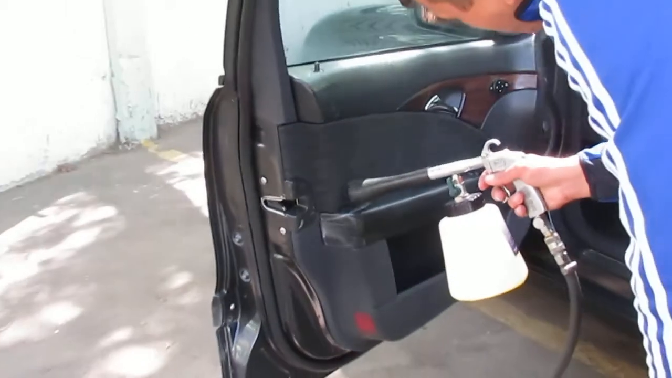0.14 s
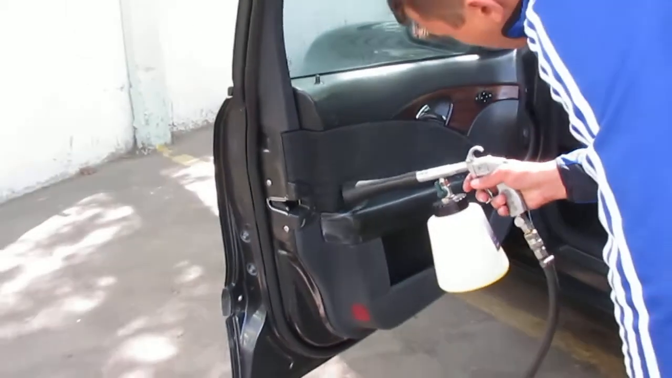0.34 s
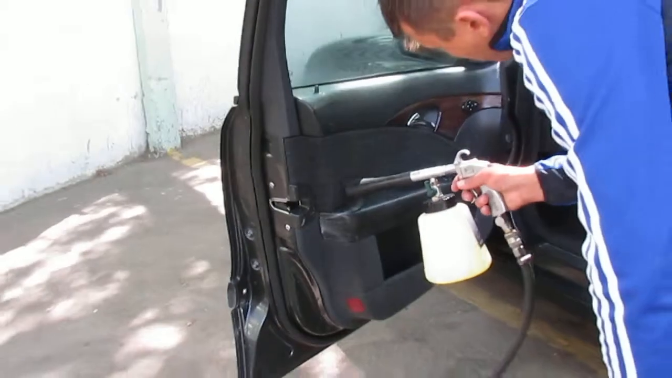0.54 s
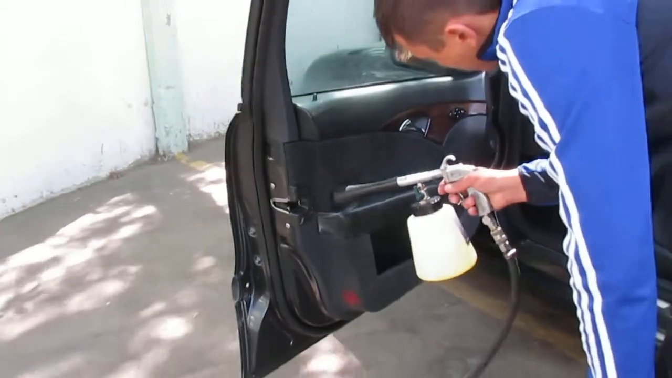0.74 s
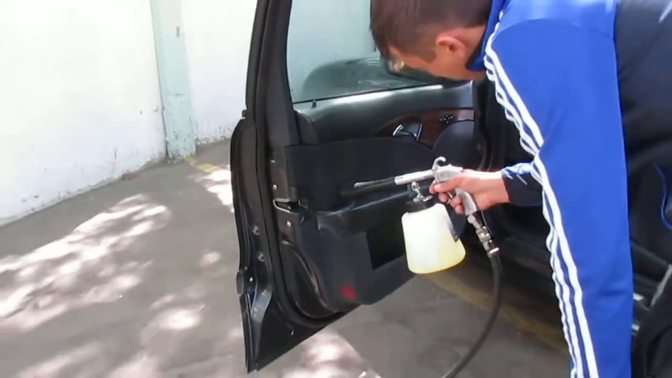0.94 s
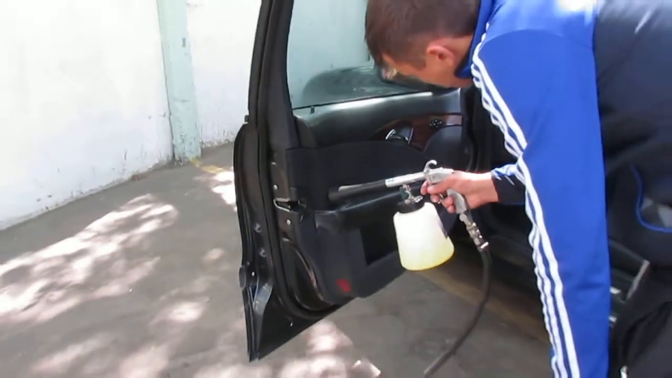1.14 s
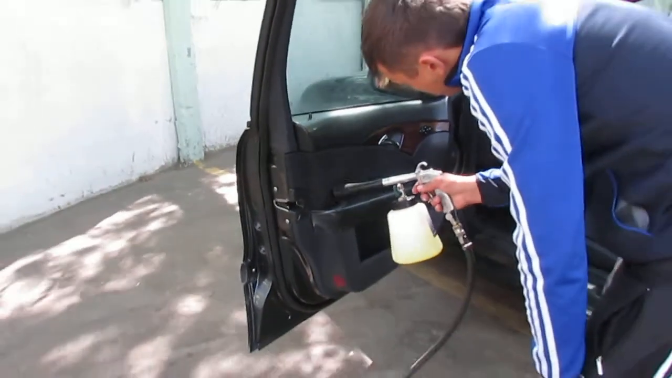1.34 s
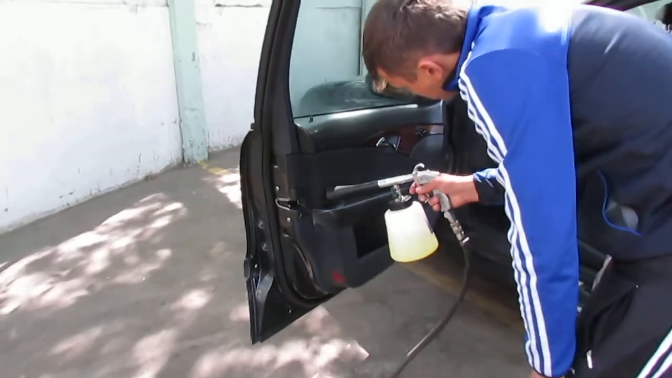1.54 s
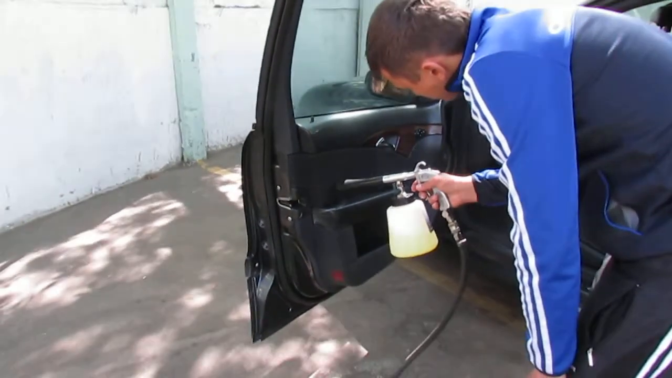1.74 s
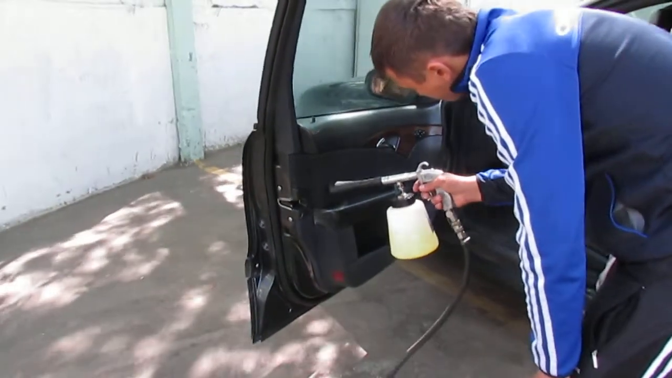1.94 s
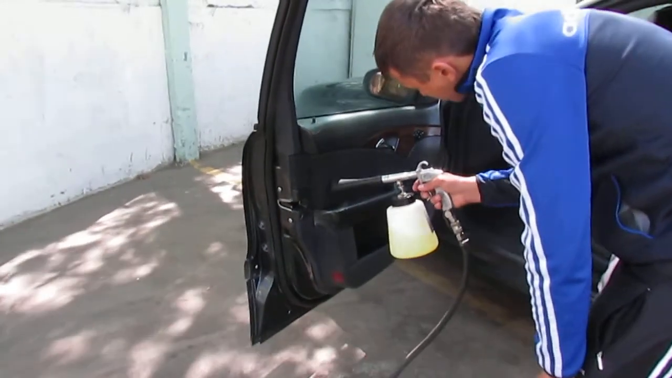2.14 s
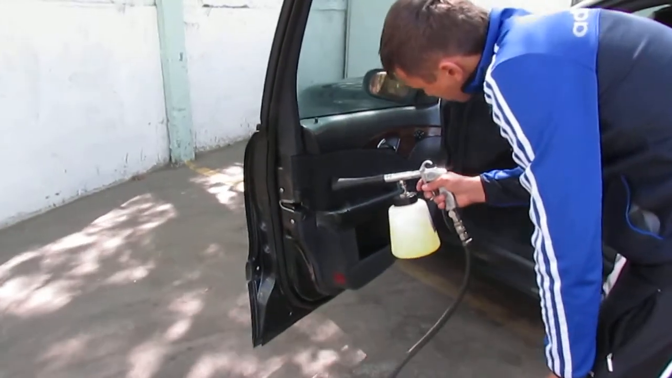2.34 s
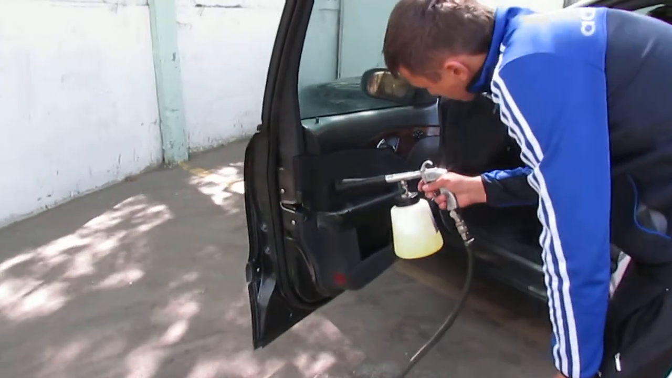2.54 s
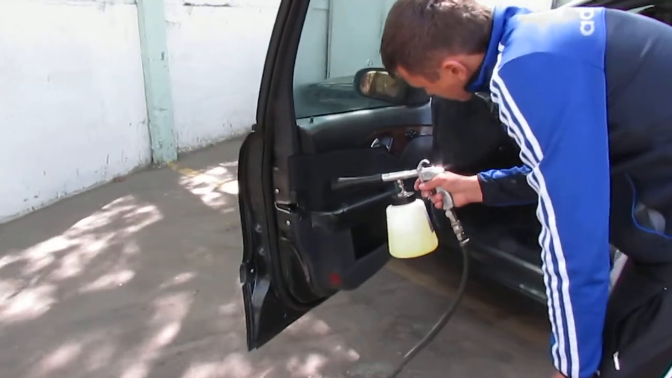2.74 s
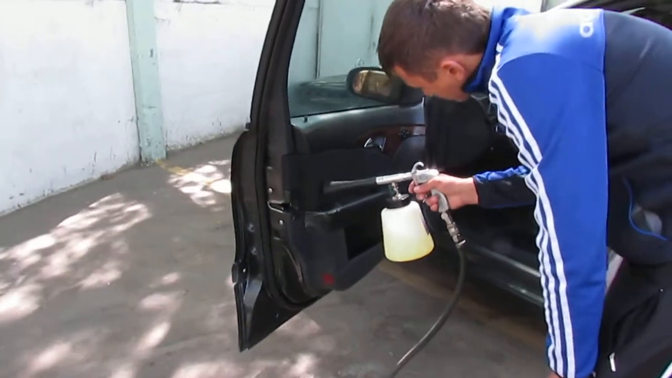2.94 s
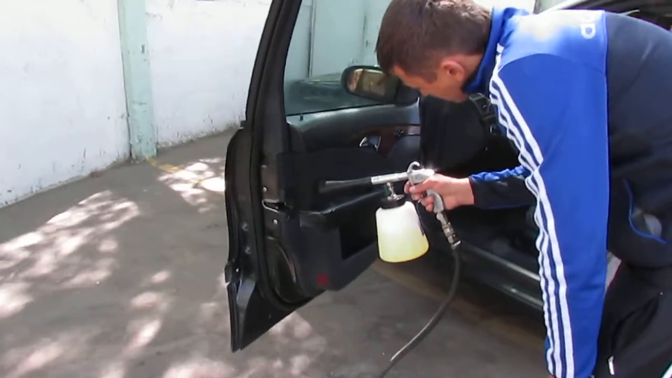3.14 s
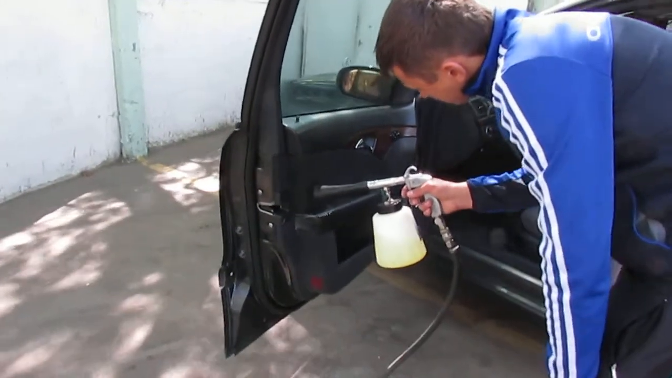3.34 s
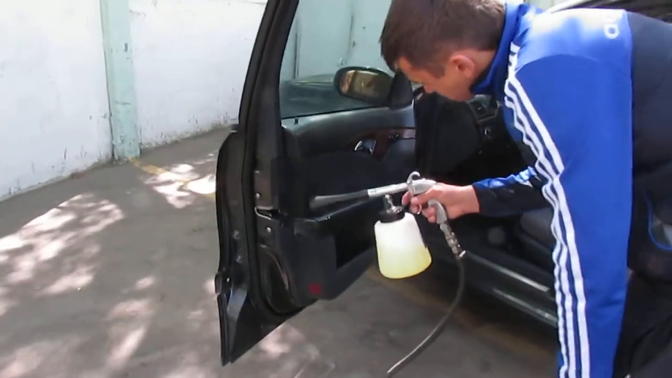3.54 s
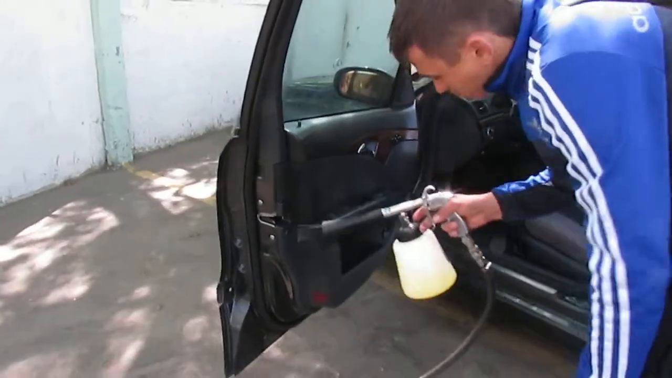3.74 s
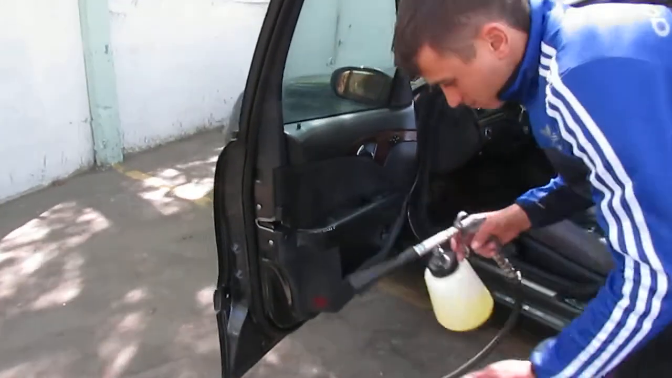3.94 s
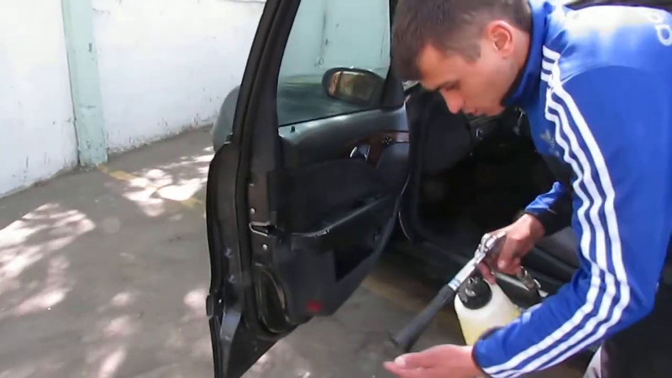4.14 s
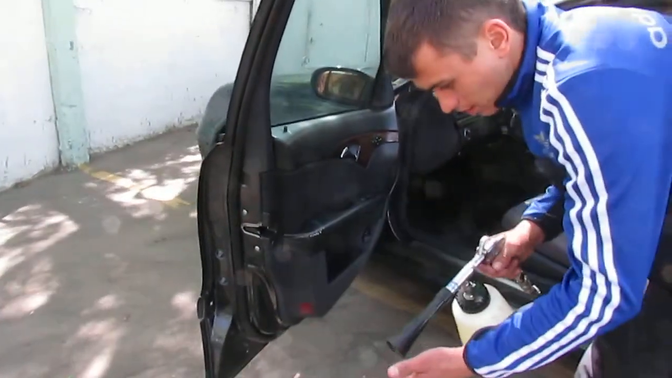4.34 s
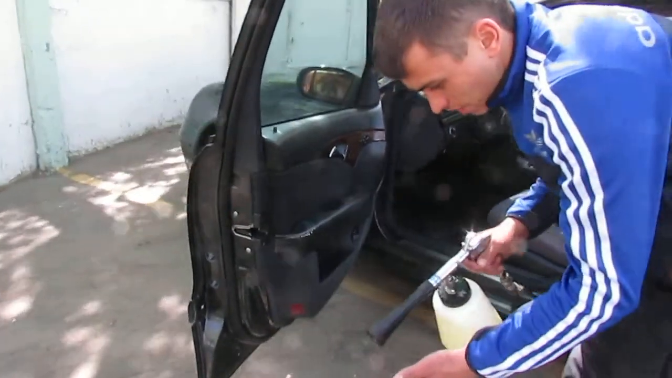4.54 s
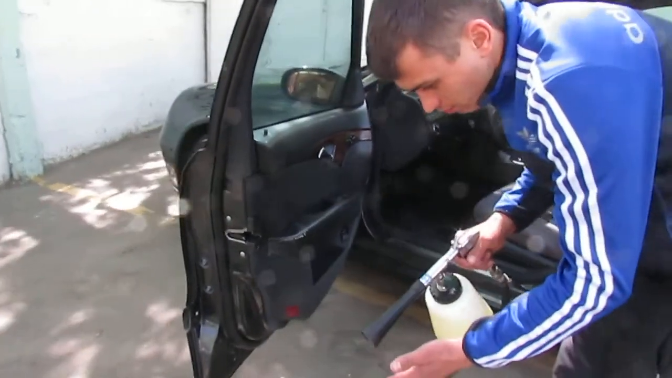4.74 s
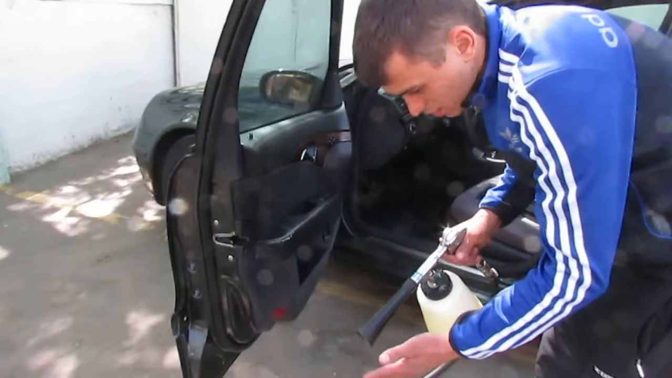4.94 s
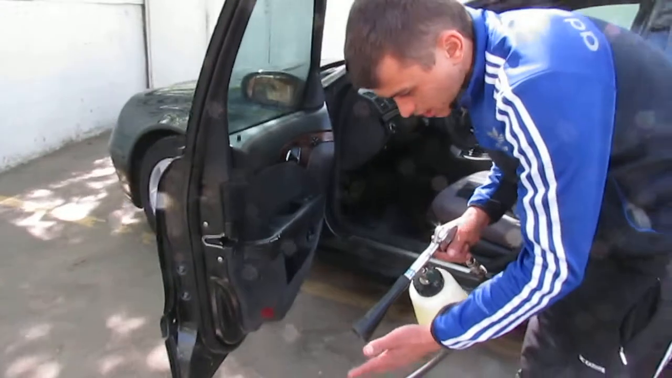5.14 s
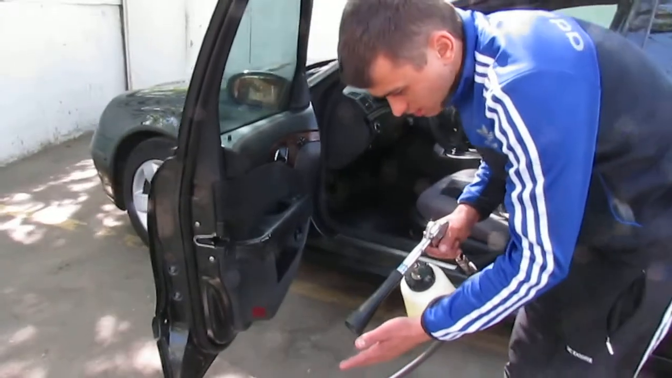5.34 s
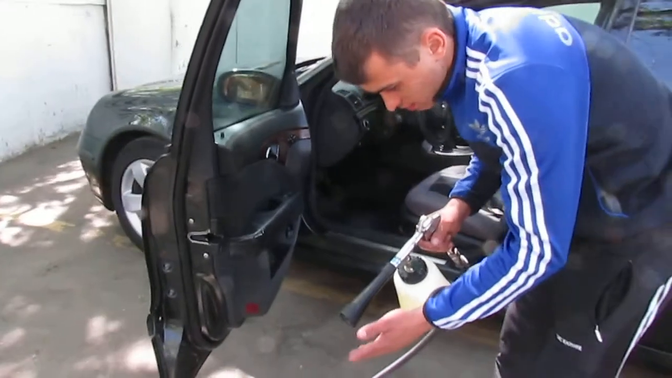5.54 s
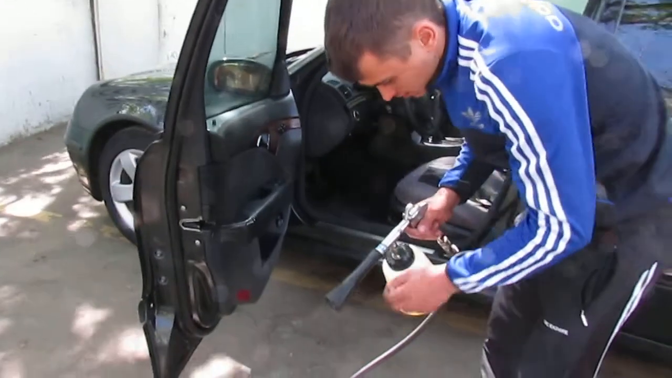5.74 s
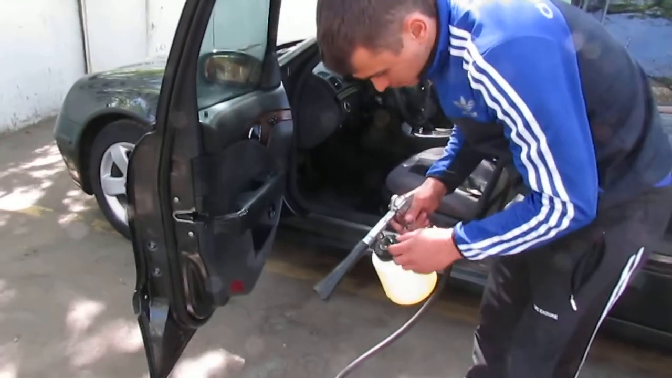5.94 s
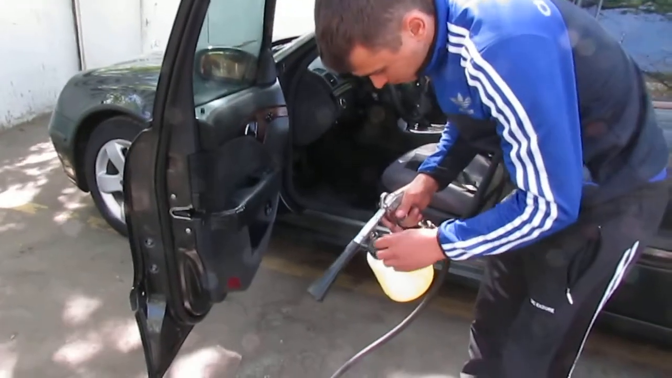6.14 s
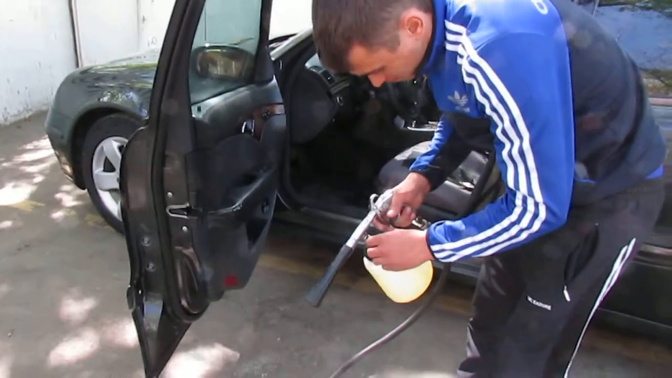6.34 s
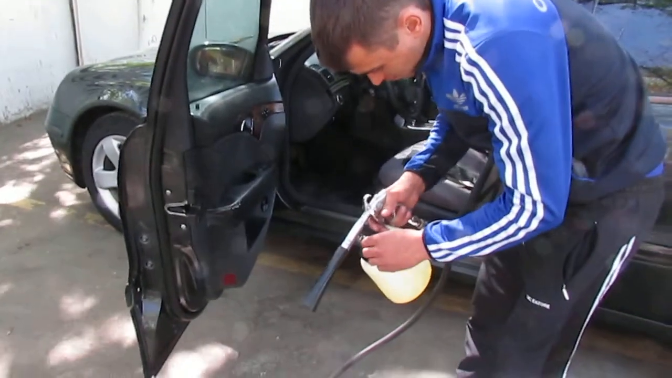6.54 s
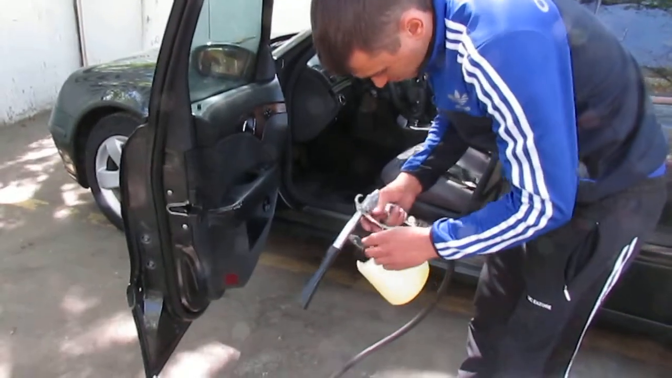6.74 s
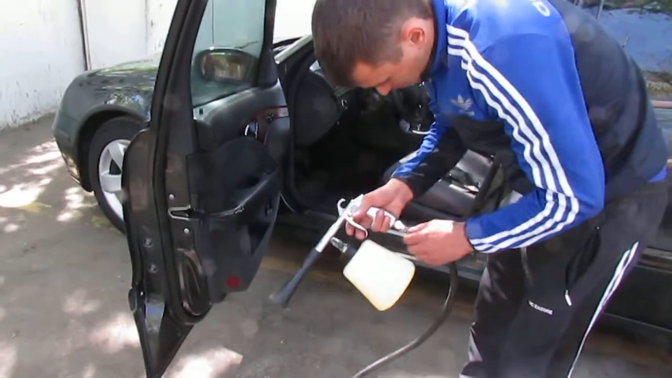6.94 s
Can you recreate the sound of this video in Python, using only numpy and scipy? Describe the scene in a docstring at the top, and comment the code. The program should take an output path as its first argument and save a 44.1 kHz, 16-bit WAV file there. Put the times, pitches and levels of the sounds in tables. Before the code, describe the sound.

Loud pulsing air hiss and a whirling hum from a cleaning gun cut off, restart with a wet splutter, then fade with a faint whistle.

```python
"""A compressed-air cleaning gun blows on a car door panel. A thin tube whirls in its cone at about 213 Hz:
the jet hums and its hiss pulses once a turn. A distant machine drones in the walled yard, and stray air
buffets the mono microphone. The cone's rim scrapes the panel. At 3.6 s the valve shuts and leaks;
the trigger clicks. At 4.27 s the gun blows on a palm, spitting liquid as the tube spins up.
At 5.9 s it shuts again: the tube coasts and the last air whistles away."""
import sys
import numpy as np
from scipy import signal
from scipy.fft import rfft, irfft, next_fast_len
from scipy.io import wavfile
from scipy.ndimage import uniform_filter1d, map_coordinates

SR = 44100
rng = np.random.default_rng(int(sys.argv[2]) if len(sys.argv) > 2 else 0)


def bounce(signal):
    """Save signal as a 16-bit WAV file at the path given by the first command-line argument."""
    frames = np.transpose(np.atleast_2d(signal))
    limited = np.clip(frames, -1, 1)
    pcm = np.round(limited * 32767).astype(np.int16)
    wavfile.write(sys.argv[1], SR, pcm)


N = 312228

DOOR_OPENS_S, DOOR_SHUTS_S, PALM_OPENS_S, PALM_SHUTS_S = -1, 3.6, 4.27, 5.928
FULL_HZ, KICK_HZ, DRAG_HZ = 213.4, 82, 1.6
SPIN_UP_TAU_S, COAST_TAU_S = .243, .6
DOOR_HUM_DB, DOOR_OCTAVE_DB, DOOR_HISS_DB, DOOR_SPLASH_DB = -23, -30.3, -19, -28.5
RASP_DB, CONE_DB, PRESS_CONE_DB, PRESS_SPLASH_DB = -29.5, -32.7, 7.5, 2.5
HUM_RISE_DB_PER_S, SCRUB_ENDS_S, SCRUB_LOSS_DB = 1.05, 1.75, 4.5
SEALS_S, LIFTS_S, SEAL_TREBLE_DB, SEAL_CORNER_HZ = .63, 1.1, -3.5, 7330
EDGE_BANDS_HZ, EDGE_WIDTH_HZ = [5400, 9350, 10800], 710
PALM_HUM_DB, PALM_HISS_DB, PALM_SPLASH_DB, SPIT_DB = -20.5, -17, -29.5, 12
HUM_EXPONENT, HUM_FLOOR_DB = 2.4, -16
MODE_DB, MODE_WIDTH_SQRT_HZ = 3.5, 2.5
NOTCH_HZ, TOP_HZ = 7870, 15720

# Noise spectra (frequency [Hz], relative density [dB])
DOOR_HISS_SPECTRUM = [(1290, -20.5), (2200, -7.5), (2860, -0.5), (3300, -8), (4230, -5.5), (4700, -4),
                      (7310, -3), (10000, -1.5), (13100, -2.5), (15500, -5)]
DOOR_SPLASH_SPECTRUM = [(100, -25), (300, -8), (480, -11.5), (740, 1), (950, 0.5), (1170, -5.5),
                        (1370, 1.5), (1780, 0), (2230, -7.5), (9000, -25)]
YARD_SPECTRUM = [(20, -14), (65, -5), (110, -13), (170, -5.5), (290, -3), (530, -10.5), (800, -8.5),
                 (990, -6.5), (1250, -15), (3200, -28.5), (5500, -34), (6500, -30), (7500, -42),
                 (15500, -52)]
RUMBLE_SPECTRUM = [(20, -8), (55, -3.5), (100, 0), (150, -4), (300, -11.5), (550, -23.5), (1500, -64)]
BLEED_SPECTRUM = [(1500, -10), (4000, -12.5), (6500, -7.5), (9700, -5.5), (10700, -20), (15500, -30)]
CLICK_SPECTRUM = [(300, -11), (1500, 7), (3500, 5), (6500, -3), (9000, -22), (15000, -33)]
PALM_HISS_SPECTRUM = [(150, -27), (500, -40), (2000, -11), (3000, -8.5), (6500, -1.5), (9500, -1.5),
                      (12000, -3), (15600, -7.5)]
PALM_SPLASH_SPECTRUM = [(80, -26), (240, 0), (500, 0), (900, 3), (1800, 3.5), (5000, 2), (12000, -16)]
# Air resonances of the cone (frequency [Hz])
DOOR_MODES_HZ = [3800, 4600, 5700, 6550, 7270, 8150, 9200, 9930, 10650, 12000, 13050, 13850, 14800, 15550]
PALM_MODES_HZ = [2700, 3350, 4100, 4750, 5550, 6550, 7400, 8300, 9400, 10250, 11350, 12400, 15400]
SPLASH_MODES_HZ = [890, 1250, 1760]
# Overtones (multiple of spin [1], relative level [dB])
RASP_PARTIALS = [(3, 3), (5, 3.5), (6, 5.5), (7, -1), (9, 0), (11, -6), (13, -6.5), (18, -11)]
DOOR_CONE_PARTIALS = [(4, 8), (7, -4.5), (8, -5)]
PALM_CONE_PARTIALS = [(4, 0), (8, 1)]

# Cone held to the panel (time [s], pressure [0-1])
CONE_PRESSURE = [(.1, 0.12), (.65, 0.98), (1.08, 0.97), (1.62, 0.05)]
# Tube races or snags (time [s], half length [s], speed change [Hz])
SPIN_STUMBLES = [(3.53, 0.039, 2), (4.59, .075, -17)]
# Hand strokes (time [s], half length [s], octave gain [dB])
HAND_STROKES = [(.07, 0.15, 10.5), (.41, 0.11, 9), (.78, 0.089, 6), (1.15, 0.13, 7.5), (1.56, 0.091, 7.5),
                (3.53, .16, 4)]
# Cone brushes the panel or lifts (time [s], half length [s], cone gain [dB], rasp gain [dB])
CONE_BRUSHES = [(.28, 0.059, 8, -1), (.37, 0.04, 9, -1), (.47, 0.024, 6, -10), (.56, 0.029, 3.5, 0),
                (.66, 0.085, 8, 3), (.82, 0.058, 4, -0.5), (.915, .035, 7.5, -1), (1, 0.038, 8, 0.5),
                (1.125, 0.044, 7.5, 2.5), (1.32, 0.032, 7, -1.5), (1.45, 0.027, 11, 0),
                (1.79, 0.024, 9, -10), (2.17, 0.11, 6.5, 1.5), (2.52, 0.086, 7, 3.5), (2.8, .11, 8, 0),
                (3.575, 0.065, 1, 7.5)]
# Jet catches an edge (time [s], half length [s], band gain [dB])
EDGE_FLARES = [(1.54, 0.033, 3.5), (2.05, 0.33, 1.5), (3.3, 0.45, 3.5), (3.52, 0.029, 1.5)]
# Wall echo (frequency [Hz], T60 [s])
WALL_DECAY = [(200, 0.47), (2000, 0.5), (8000, 0.3), (15000, 0.3)]
# Yard background (time [s], level [dB])
YARD_LEVELS = [(3.7, -47), (6, -43), (7.08, -42.5)]
# Distant machine (frequency [Hz], relative level [dB])
MACHINE_LINES = [(409, -60.5), (931, -59.5), (985, -57.5), (1012, -59)]
# Gusts on the microphone (start [s], end [s], level [dB])
MIC_GUSTS = [(1.837, 3.519, -41), (2.33, 2.832, -34.5), (3.753, 4.082, -40.5)]
# Puffs on the microphone (time [s], peak [dB], half length [s])
MIC_PUFFS = [(0.403, -23, 0.0056), (2.551, -15.5, 0.005), (2.5566, -10, 0.0016), (2.6, -12, 0.0027),
             (2.757, -21, 0.0023), (2.925, -21.5, 0.005), (3.052, -16.5, 0.0047), (3.443, -16.5, 0.0048),
             (4.065, -20, 0.0034)]
# Rim on the panel (time [s], half length [s], frequency [Hz], level [dB])
RIM_SCRAPES = [(.42, 0.038, 1697, -27), (.55, 0.032, 1493, -28), (.675, 0.069, 1694, -23),
               (.98, 0.1, 1675, -26.5), (1.08, 0.065, 1490, -23.5), (2.49, 0.05, 1470, -30),
               (3.44, 0.098, 960, -30.5)]
# The level dips briefly and creeps back (time [s], depth [dB])
LEVEL_DIPS = [(.655, 2), (2.551, 3.5), (4.319, 3.5)]
# Ringing overtones (time [s], half length [s], multiple of spin [1], level [dB])
OVERTONE_RINGS = [(3.17, 0.35, 6, -35), (3.38, .13, 5, -37), (3.57, 0.045, 3, -28),
                  (4.545, 0.034, 4, -39.5), (4.76, .1, 5, -40), (6.159, .03, 3, -42.5)]
# Hum of the coasting tube (start [s], hold [s], level [dB])
COAST_HUMS = [(3.595, 0.033, -35), (5.94, 0.18, -38)]
# Valve leak (time [s], half length [s], frequency [Hz], level [dB])
LEAK_WHISTLES = [(3.71, 0.093, 3980, -54), (6.13, .08, 3950, -56), (6.15, 0.15, 10050, -58),
                 (6.4, 0.46, 6550, -62.5), (3.7, .4, 9900, -70)]
# Trigger (time [s], relative level [dB])
TRIGGER_CLICKS = [(4.04, -22.5), (4.19, -34.5)]
# Jet square on the palm (time [s], half length [s], splash gain [dB])
PALM_HITS = [(5.28, 0.26, 6)]
# Jet closest to the palm (time [s], half length [s], hum gain [dB], hiss gain [dB])
PALM_CLOSEST = [(5.35, 0.26, 1, 0.8)]


def amp(db):
    """Decibels to gain."""
    return np.exp(np.asarray(db) * np.log(10) / 20)


def unit(x):
    """Scale to rms 1."""
    return x / np.sqrt(np.mean(x ** 2) + 1e-20)


def clock():
    """Sample times in seconds."""
    return np.arange(N) / SR


def log_interp(points, hz):
    """Interpolate points on a log frequency axis."""
    knots_hz, values = np.transpose(points)
    return np.interp(np.log(hz + 1), np.log(knots_hz + 1), values)


def curve(points):
    """Interpolate (time, value) points per sample."""
    return np.interp(clock(), *np.transpose(points))


def wobble(rate_hz):
    """Smooth random curve, rate_hz knots a second."""
    knots = rng.standard_normal(int(N * rate_hz / SR) + 4)
    coarse_s = clock()[::32]
    return np.interp(clock(), coarse_s, map_coordinates(knots, [coarse_s * rate_hz]))


def gate(start_s, end_s, rise_s, fall_s):
    """Smooth rise from start_s, exponential decay from end_s."""
    t = clock()
    ramp = np.sin(np.pi / 2 * np.clip((t - start_s) / rise_s, 0, 1)) ** 2
    return ramp * np.exp(-np.maximum(t - end_s, 0) / fall_s)


def swells(rows, order=2):
    """Bells from (time, half length, heights...), a curve per height; higher order, flatter top."""
    rows = np.asarray(rows)
    distance = np.minimum(((clock() - rows[:, :1]) / rows[:, 1:2]) ** 2, 20)
    return rows[:, 2:].T @ np.exp(-distance ** (order // 2))


def bumps(hz, centres_hz, width_hz):
    """Bells of height 1 over frequency."""
    return np.exp(-((hz - np.asarray(centres_hz)[:, None]) / width_hz) ** 2).sum(axis=0)


def filtered(x, response):
    """Apply a frequency response."""
    size = next_fast_len(N + SR // 2)
    return irfft(rfft(x, size) * response(np.fft.rfftfreq(size, 1 / SR)), size)[:N]


def noise(spectrum):
    """Coloured noise, rms 1."""
    return unit(filtered(rng.standard_normal(N), lambda hz: amp(log_interp(spectrum, hz))))


def noise_bands(rows, width_hz):
    """Narrow noise bands that swell and fade."""
    phase_per_hz = 2 * np.pi * clock()
    bands = np.zeros(N)
    for time_s, half_s, hz, db in rows:
        band = wobble(width_hz) * np.cos(hz * phase_per_hz)
        band += wobble(width_hz) * np.sin(hz * phase_per_hz)
        bands += swells([(time_s, half_s, amp(db))])[0] * band
    return bands


def tube_speed_hz():
    """Air spins the tube up, the panel drags on it, and without air it coasts."""
    t = clock()
    coasting = lambda shuts_s: np.exp(-np.maximum(t - shuts_s, 0) / COAST_TAU_S)
    door_hz = (FULL_HZ - DRAG_HZ * curve(CONE_PRESSURE)) * coasting(DOOR_SHUTS_S)
    deficit_hz = (FULL_HZ - KICK_HZ) * np.exp(-np.maximum(t - PALM_OPENS_S, 0) / SPIN_UP_TAU_S)
    palm_hz = (FULL_HZ - deficit_hz) * coasting(PALM_SHUTS_S)
    return np.where(t < PALM_OPENS_S, door_hz, palm_hz) + swells(SPIN_STUMBLES)[0] + .2565 * wobble(18)


def overtones(turn_rad, partials, wander_db, smear_rad):
    """Lines of suction pulses locked to the spin, each wavering on its own; rms 1."""
    lines = np.zeros(N)
    for k, db in partials:
        gain = amp(db + wander_db * wobble(17))
        jitter_rad = smear_rad * (wobble(17) + .5 * wobble(90))
        lines += gain * np.cos(k * (turn_rad - np.pi) + jitter_rad)
    return -unit(lines)


def rasp(turn_rad, wander_db, smear_rad):
    """The jet slaps the surface once a turn."""
    partials = [(k, log_interp(RASP_PARTIALS, k)) for k in range(3, 19) if k != 4]
    return overtones(turn_rad, partials, wander_db, smear_rad)


def turn_pulse(turn_rad, depth_db, lag_rad):
    """Gain of the swinging jet, peaking once a turn."""
    return unit(amp(depth_db * np.cos(turn_rad - lag_rad)))


def jet_noise(spectrum, modes_hz, patchy_db):
    """Turbulence resonating in the cone; its colour shifts in patches as the aim wanders."""
    hz, _, frames = signal.stft(noise(spectrum), SR, nperseg=512)
    patches = uniform_filter1d(rng.standard_normal(frames.shape), size=4, axis=0)
    patches = unit(uniform_filter1d(patches, size=70, axis=1))
    resonance_db = MODE_DB * bumps(hz, modes_hz, MODE_WIDTH_SQRT_HZ * np.sqrt(hz + 1))
    frames *= amp(resonance_db[:, None] + patchy_db * patches)
    return unit(signal.istft(frames, nperseg=512)[1][:N])


def door_blast(turn_rad):
    """The jet hums and hisses; each slap on the panel buzzes, rings the cone and sheds turbulence."""
    pressure = curve(CONE_PRESSURE)
    brush_cone_db, brush_rasp_db = swells(CONE_BRUSHES)
    hum = amp(DOOR_HUM_DB + HUM_RISE_DB_PER_S * clock() + .47 * wobble(18)) * unit(np.cos(turn_rad))
    scrubbing = gate(DOOR_OPENS_S, SCRUB_ENDS_S, rise_s=.01, fall_s=.041)
    octave_db = DOOR_OCTAVE_DB - SCRUB_LOSS_DB * scrubbing + swells(HAND_STROKES, order=4)[0]
    octave = amp(octave_db) * unit(np.sin(2 * turn_rad))
    slap_gain = unit(amp(.9 * wobble(150)))
    cone = overtones(turn_rad - .16, DOOR_CONE_PARTIALS, wander_db=1, smear_rad=.2)  # lags the slap
    cone *= amp(CONE_DB + PRESS_CONE_DB * pressure + brush_cone_db)
    buzz = amp(RASP_DB + brush_rasp_db) * rasp(turn_rad, wander_db=2.2, smear_rad=.28)
    splash = jet_noise(DOOR_SPLASH_SPECTRUM, [], patchy_db=2.3)
    splash *= amp(DOOR_SPLASH_DB + PRESS_SPLASH_DB * pressure)
    splash *= turn_pulse(turn_rad, depth_db=1.3, lag_rad=np.pi)
    hiss = edge_flare(jet_noise(DOOR_HISS_SPECTRUM, DOOR_MODES_HZ, patchy_db=1.2))
    hiss *= amp(DOOR_HISS_DB + .45 * wobble(130)) * turn_pulse(turn_rad, depth_db=2.5, lag_rad=4.6)
    flow = gate(DOOR_OPENS_S, DOOR_SHUTS_S, rise_s=.01, fall_s=.0044)
    return flow * (hum + octave + slap_gain * (cone + buzz + splash) + cone_seal(hiss))


def wall_echo(x):
    """Yard echo, thin in the bass; each frequency decays at its own rate."""
    hz, t, frames = signal.stft(rng.standard_normal(SR // 2), SR, nperseg=256)
    t60_s = log_interp(WALL_DECAY, hz)[:, None]
    tail = signal.istft(frames * amp(-60 * t / t60_s), SR, nperseg=256)[1]
    wet = signal.fftconvolve(x, tail / np.linalg.norm(tail))[:N]
    return filtered(wet, lambda hz: hz / np.hypot(hz, 300))


def yard():
    """Outdoor noise and the wavering lines of a distant machine."""
    drone = np.zeros(N)
    for hz, db in MACHINE_LINES:
        drone += amp(db + 1.9 * wobble(5)) * np.sin(2 * np.pi * hz * clock() + .23 * wobble(1.7))
    return amp(curve(YARD_LEVELS)) * (noise(YARD_SPECTRUM) + amp(-7) * unit(drone))


def buffeting():
    """Stray air on the microphone: a faint draught, rumbling gusts, soft thumps."""
    rumble = unit(noise(RUMBLE_SPECTRUM) * amp(4.9 * np.tanh(wobble(32))))
    gusts = sum(amp(db) * gate(start_s, end_s, rise_s=.037, fall_s=.021)
                for start_s, end_s, db in MIC_GUSTS)
    thumps = np.zeros(N)
    for time_s, db, half_s in MIC_PUFFS:
        offset = (clock() - time_s) / half_s
        thumps -= amp(db) * np.cos(3.13 * offset) * np.exp(-offset ** 2)
    return (amp(-54.5) + gusts) * rumble + thumps


def rim_scrapes(turn_rad):
    """The rim rasps on the panel, one rough pulse a turn."""
    return noise_bands(RIM_SCRAPES, width_hz=95) * turn_pulse(turn_rad, depth_db=7, lag_rad=np.pi)


def cone_seal(hiss):
    """The cone seals on the panel and shuts in the treble."""
    sealed = gate(SEALS_S, LIFTS_S, rise_s=.03, fall_s=.2)
    treble = filtered(hiss, lambda hz: hz ** 4 / (hz ** 4 + SEAL_CORNER_HZ ** 4))
    return hiss + (amp(SEAL_TREBLE_DB * sealed) - 1) * treble


def level_dips():
    """Gain that drops abruptly and creeps back."""
    return amp(-sum(db * gate(s, s + .035, rise_s=.035, fall_s=.5) for s, db in LEVEL_DIPS))


def edge_flare(hiss):
    """Bright bands swell as the jet catches an edge."""
    bright = filtered(hiss, lambda hz: bumps(hz, EDGE_BANDS_HZ, EDGE_WIDTH_HZ))
    return hiss + (amp(swells(EDGE_FLARES)[0]) - 1) * bright


def rings(turn_rad):
    """One overtone rings as the jet finds a hollow or the tube grazes the cone."""
    ringing = np.zeros(N)
    for time_s, half_s, k, db in OVERTONE_RINGS:
        envelope = swells([(time_s, half_s, amp(db))], order=4)[0]
        ringing += envelope * overtones(turn_rad, [(k, 0)], wander_db=1.5, smear_rad=.35)
    return ringing


def run_down(turn_rad):
    """Valve shut: the tube coasts, the leak whistles, a thin hiss dies away."""
    coasting = sum(amp(db) * gate(s, s + hold_s, rise_s=.024, fall_s=.053)
                   for s, hold_s, db in COAST_HUMS)
    hum = coasting * unit(np.cos(turn_rad))
    whistles = noise_bands(LEAK_WHISTLES, width_hz=420)
    bleed = amp(-60) * gate(3.55, 4, rise_s=.05, fall_s=1)
    bleed += amp(-44.5) * gate(5.9, 5.6, rise_s=.044, fall_s=.51)
    return hum + whistles + bleed * jet_noise(BLEED_SPECTRUM, PALM_MODES_HZ, patchy_db=2.5)


def trigger():
    """Short dry clicks of the hand on the gun."""
    strikes = sum(amp(db) * gate(s, s + .0037, rise_s=.0011, fall_s=.0086) for s, db in TRIGGER_CLICKS)
    return amp(-15) * strikes * noise(CLICK_SPECTRUM)


def palm_blast(turn_rad, speed_hz):
    """The gun spits liquid as the tube spins up, then settles to a smoother hiss and soft hum."""
    spitting = gate(4.116, 4.385, rise_s=.25, fall_s=.022)
    spinning_up = gate(4.35, 5.1, rise_s=.55, fall_s=.1)
    at_speed = gate(4.8, PALM_SHUTS_S, rise_s=.4, fall_s=.1)
    close_hum_db, close_hiss_db = swells(PALM_CLOSEST)
    speed_db = np.maximum(HUM_EXPONENT * 20 * np.log10(speed_hz / FULL_HZ), HUM_FLOOR_DB)
    octave = (amp(-23.5) + amp(-15) * spinning_up + spitting) * np.sin(2 * turn_rad + .5 * wobble(20))
    hum = amp(PALM_HUM_DB + close_hum_db + speed_db + .39 * wobble(32)) * unit(np.cos(turn_rad) + octave)
    splash_db = PALM_SPLASH_DB + SPIT_DB * spitting + swells(PALM_HITS, order=4)[0]
    cone = overtones(turn_rad, PALM_CONE_PARTIALS, wander_db=3, smear_rad=.55)
    slaps = rasp(turn_rad, wander_db=4, smear_rad=.66)
    buzz = amp(splash_db - 8.5) * (.5 * spitting + at_speed) * (.5 * slaps + cone)
    spatter_db = (2.5 + 2.5 * spitting) * np.tanh(wobble(420))
    splash = amp(splash_db + spatter_db) * jet_noise(PALM_SPLASH_SPECTRUM, SPLASH_MODES_HZ, patchy_db=1.5)
    hiss = amp(PALM_HISS_DB + close_hiss_db) * jet_noise(PALM_HISS_SPECTRUM, PALM_MODES_HZ, patchy_db=1)
    hiss *= turn_pulse(turn_rad, depth_db=1.7, lag_rad=np.pi)
    flow = gate(PALM_OPENS_S, PALM_SHUTS_S, rise_s=.014, fall_s=.011)
    return flow * (hum + buzz + splash + hiss)


def scene():
    """Gun, echo, stray air and yard on one microphone."""
    speed_hz = np.maximum(tube_speed_hz(), 1)
    turn_rad = 2 * np.pi * np.cumsum(speed_hz) / SR
    jet = level_dips() * (door_blast(turn_rad) + palm_blast(turn_rad, speed_hz))
    gun = jet + rim_scrapes(turn_rad) + rings(turn_rad) + run_down(turn_rad) + trigger()
    mono = gun + amp(-16.5) * wall_echo(gun) + buffeting() + yard()
    return np.array([mono, mono])


def record(dry):
    """Narrow notch of the microphone port, then the band limit."""
    port = lambda hz: 1 - .85 / (1 + ((hz - NOTCH_HZ) / 70) ** 2)
    band = lambda hz: np.sin(np.pi / 2 * np.clip((TOP_HZ + 100 - hz) / 200, 0, 1)) ** 2
    return np.array([filtered(channel, lambda hz: port(hz) * band(hz)) for channel in dry])


dry = scene()
out = record(dry)
bounce(out)
```